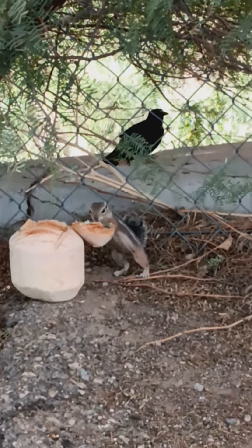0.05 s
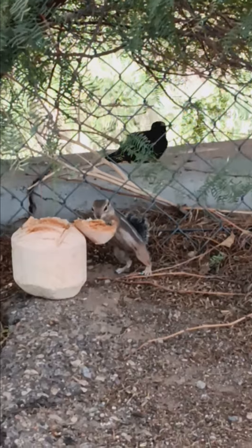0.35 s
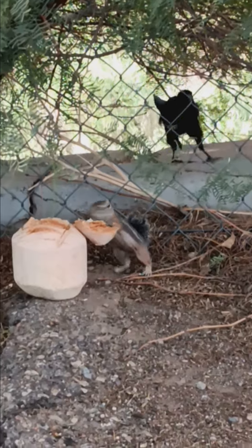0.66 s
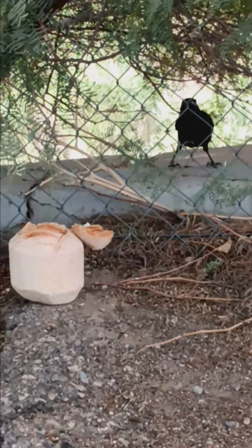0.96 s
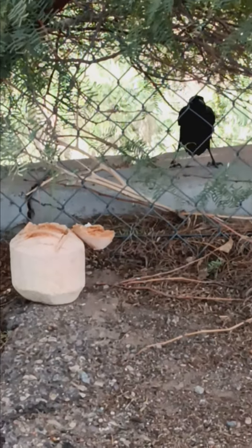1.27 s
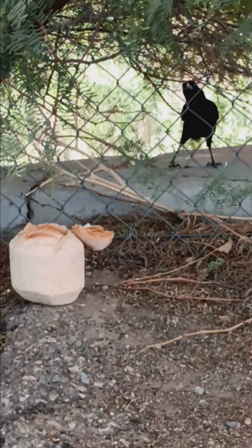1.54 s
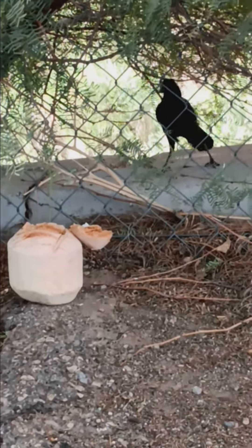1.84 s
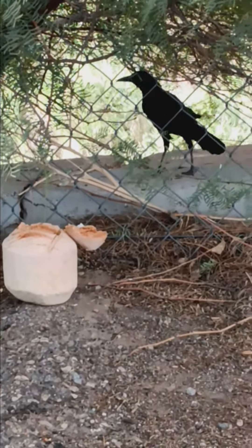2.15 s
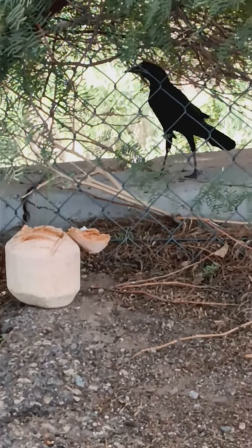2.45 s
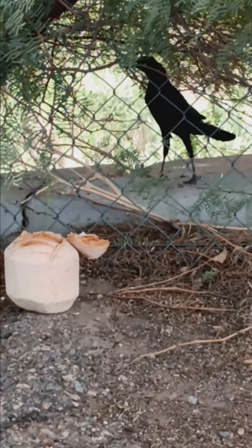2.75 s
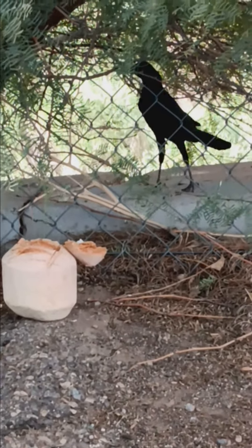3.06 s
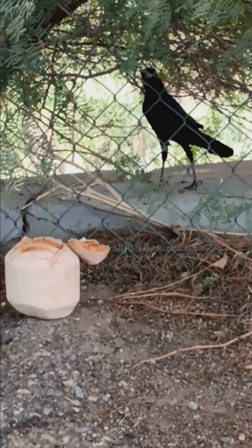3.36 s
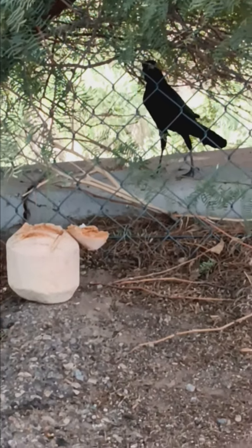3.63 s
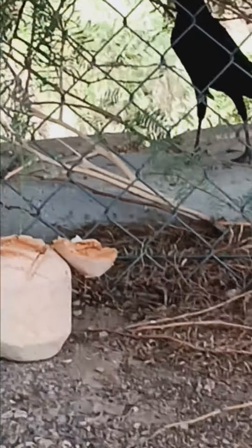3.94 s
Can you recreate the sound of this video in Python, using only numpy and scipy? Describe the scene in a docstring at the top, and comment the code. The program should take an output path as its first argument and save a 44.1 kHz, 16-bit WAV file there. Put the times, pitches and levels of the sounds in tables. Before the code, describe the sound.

A small rodent scurries through dry twigs and litter over a distant traffic rumble.

```python
"""A rodent scurries off

A small rodent leaves its food and runs through dry twigs and litter beside a fence. Each footfall
crushes a cluster of tiny, very bright crackles, mostly on the right. Stalks snap, twigs tick and a
hard scrap knocks once. Distant traffic rumbles underneath, with a wavering engine drone and a little
tyre noise. On the left there are soft bumps, a few dry clicks and, near the end, a far-off whirr."""
import sys
import numpy as np
from scipy import signal
from scipy.io import wavfile

SR = 44100
rng = np.random.default_rng(int(sys.argv[2]) if len(sys.argv) > 2 else 0)


def generate_wav(signal):
    """Clip the signal to [-1, 1] and save it as 16-bit WAV at the path in sys.argv[1]."""
    frames = np.transpose(np.atleast_2d(signal))
    scaled = np.clip(frames, -1, 1) * 32767
    pcm = np.round(scaled).astype(np.int16)
    wavfile.write(sys.argv[1], SR, pcm)


N = 176400  # 4 seconds


def from_db(db):
    """Turn decibels into a number to multiply by."""
    return 10 ** (np.asarray(db) / 20)


def rms_one(x):
    """Scale a signal so its average strength (rms) is 1."""
    return x / np.sqrt(np.mean(x ** 2) + 1e-20)


def level_curve(rows):
    """Join (t/s, level/dB) points into a gain for every sample."""
    return from_db(np.interp(np.arange(N) / SR, *np.transpose(rows)))


def at_hz(points, hz):
    """Read a table at one frequency, with octaves evenly spaced."""
    freqs, values = np.transpose(points)
    return np.interp(np.log(hz), np.log(freqs), values)


def drift(rate):
    """A smooth random wobble of size about 1; a higher rate wobbles faster."""
    r = np.exp(-80 * np.pi * rate / SR)
    noise = rng.standard_normal(N // 40 + 2002)  # one value every 40 samples
    slow = signal.lfilter([1], [1, -2 * r, r * r], noise)[2000:]
    return np.interp(np.arange(N) / 40, np.arange(len(slow)), rms_one(slow))


def keep_band(x, kind, hz, order):
    """Keep the "low", "high" or "band" part of a sound; a higher order cuts more steeply."""
    return signal.sosfilt(signal.butter(order, hz, kind, fs=SR, output="sos"), x)


def resonate(x, hz, width_hz):
    """Make a sound ring around one frequency."""
    r = np.exp(-np.pi * width_hz / SR)
    feedback = [1, -2 * r * np.cos(2 * np.pi * hz / SR), r * r]
    return signal.lfilter(np.array([1, 0, -1]) * (1 - r * r) / 2, feedback, x + 1e-18)


def narrow(x, hz, width_hz):
    """Resonate twice, so less gets through on either side."""
    return resonate(resonate(x, hz, width_hz), hz, width_hz)


def impulses(rows):
    """One sharp tap for each (t/s, level/dB) row."""
    out = np.zeros(N)
    for s, db in rows:
        out[int(s * SR)] += from_db(db)
    return out + 1e-18


def strike(rows, tones):
    """Taps set an object's own tones ringing; each falls 60 dB in its ring time."""
    out, taps = 0, impulses(rows)
    for hz, db, ring_s in tones:
        r = np.exp(-np.log(1000) / (ring_s * SR))
        w = 2 * np.pi * hz / SR
        out = out + from_db(db) * signal.lfilter([0, np.sin(w)], [1, -2 * r * np.cos(w), r * r], taps)
    return out


def burst(rows, rings, decay_s):
    """Each break is a quickly dying spray of tiny cracks that ring."""
    force = signal.lfilter([1], [1, -np.exp(-1 / (decay_s * SR))], impulses(rows))
    return sum(from_db(db) * resonate(force * rng.choice([-1, 1], N), hz, width)
               for hz, width, db in rings)


def pressure(rows, attack_s, release_s):
    """Each touch builds up, holds for its length and dies away."""
    t, power = np.arange(N) / SR, 0
    for s, db, length in rows:
        rise = np.clip((t - s) / attack_s, 0, 1)
        fall = np.exp(-np.clip((t - s - length) / release_s, 0, 20))
        power = power + (from_db(db) * rise * fall) ** 2
    return np.sqrt(power)


def crackle(per_s=650, spread_db=4.2):
    """Tiny cracks of uneven size at random moments."""
    sizes = from_db(spread_db * np.minimum(rng.exponential(1, N), 3.5)) * rng.choice([-1, 1], N)
    return rms_one(sizes * (rng.random(N) < per_s / SR))


def pan(x, left_db=0, right_db=0):
    """Give each side its own level."""
    return from_db([[left_db], [right_db]]) * x


def scatter(x, level_db, ring_s=0.14):
    """A short, blurred echo from the ground, the kerb and the bushes."""
    t = np.arange(SR // 4) / SR
    tails = rng.standard_normal((2, len(t))) * np.exp(-np.log(1000) * t / ring_s)
    return from_db(level_db) * np.array([signal.fftconvolve(x, h / np.linalg.norm(h))[:N] for h in tails])


# how alike the two sides sound: f/Hz, likeness (1 = the same)
LIKENESS = [(30, .99), (180, .98), (300, .88), (600, .65), (1400, .6), (3000, .3), (12000, .1)]
# how much louder the left side is: f/Hz, left minus right/dB
BALANCE = [(60, 0), (190, 1), (330, 5.5), (700, 3), (1300, 1.5), (2000, 0), (3000, 4.5), (12000, -0.2)]
def banded_noise(spectrum, flicker_db):
    """Stereo noise of strength 1, built from bands a third of an octave wide that each flicker."""
    centres = 25 * 2 ** (np.arange(29) / 3)
    sides = np.array([[1], [-1]])
    out, white = 0, rng.standard_normal((2, 2, N + SR // 2))
    for k, hz in enumerate(centres):
        if spectrum[0][0] / 1.13 < hz < spectrum[-1][0] * 1.13:
            common, opposed = keep_band(white[k % 2], "band", [hz / 1.12, hz * 1.12], order=2)[:, -N:]
            alike = at_hz(LIKENESS, hz)
            gain = from_db(at_hz(spectrum, hz) + flicker_db * drift(9.1))
            lean = from_db(sides * at_hz(BALANCE, hz) / 2)
            out = out + gain * lean * (np.sqrt(1 + alike) * common + np.sqrt(1 - alike) * opposed * sides)
    return rms_one(out)


# which way the sound leans: t/s, left minus right/dB
SWAY = [(0.0, 0), (0.68, -2.5), (0.93, -0.5), (1.14, -6.5), (1.38, -1.5), (3.87, 1.5), (3.94, -1), (4.0, 2)]
def sway(x):
    """Shift a sound gently between the sides."""
    return x * level_curve(SWAY) ** np.array([[.5], [-.5]])


# tone colour of the rumble, road roar, tyres and air: f/Hz, relative level/dB
RUMBLE_COLOUR = [(25, -14.5), (40, -4), (55, 0), (80, -0.5), (100, 0), (130, -8), (180, -7), (220, -22)]
ROAD_COLOUR = [(200, -4), (260, 0), (340, 0.5), (420, -7.5), (600, -12.5), (800, -12), (1100, -18.5),
               (1400, -19.5), (2200, -30)]
TYRE_COLOUR = [(700, -2.5), (1000, -12.5), (1300, 3), (1600, 1.5), (1950, -3.5), (2600, 0)]
AIR_COLOUR = [(1410, -29.5), (2400, -4.5), (3830, -7.5), (5330, -8), (7500, -13), (8800, -11.5),
              (10800, -11.5), (15000, -16.5)]
# how the traffic rises and falls: t/s, relative level/dB
RUMBLE_LEVEL = [(0.0, -48.5), (0.13, -47), (0.5, -47.5), (0.54, -56.5), (0.68, -44.5), (1.51, -56),
                (1.66, -45.5), (1.73, -61.5), (1.83, -44.5), (2.16, -52.5), (2.71, -43.5), (3.07, -51.5),
                (3.42, -50), (3.44, -45), (3.71, -51), (3.8, -45), (3.83, -59), (4.0, -48)]
ROAD_LEVEL = [(0, -68.5), (1.3, -67.5), (2.4, -67), (4, -66.5)]
TYRE_LEVEL = [(0, -78), (1.2, -89), (1.5, -77), (2.3, -75.5), (2.8, -70.5), (3.2, -82), (4, -90)]
def traffic():
    """Deep rumble, road roar and tyre noise that comes and goes, over the faint hiss of still air."""
    rumble = from_db(3.5) * level_curve(RUMBLE_LEVEL) * banded_noise(RUMBLE_COLOUR, flicker_db=1.0)
    road = from_db(3.5) * level_curve(ROAD_LEVEL) * banded_noise(ROAD_COLOUR, flicker_db=2.5)
    tyres = level_curve(TYRE_LEVEL) * banded_noise(TYRE_COLOUR, flicker_db=1.5)
    air = from_db(-81.5) * banded_noise(AIR_COLOUR, flicker_db=.7)
    return sway(rumble) + road + keep_band(tyres, "low", hz=2150, order=6) + air


# the engine's weaker overtones: multiple of its note, relative level/dB
ENGINE_OVERTONES = [(1.25, -33), (1.5, -21.5), (2.25, -33), (2.497, -39.5)]
# how the drone rises and falls: t/s, relative level/dB
ENGINE_LEVEL = [(0.0, -56.5), (0.66, -57), (0.7, -44.5), (0.87, -60), (1.54, -51), (1.63, -40),
                (1.71, -50.5), (2.12, -50), (2.21, -60.5), (2.41, -45), (3.22, -55.5), (3.3, -41),
                (3.38, -58), (3.48, -43.5), (3.8, -53), (3.83, -64), (3.97, -48.5), (4.0, -70)]
def engine_drone(note_hz=178.6, wander_hz=1.427, roughness=0.39):
    """A far engine's note and its overtones waver in pitch and strength."""
    phase = 2 * np.pi * np.cumsum(note_hz + wander_hz * drift(2.81)) / SR
    note = 0
    for multiple, db in [(1, 0.026)] + ENGINE_OVERTONES:
        tone = (1 + roughness * drift(21.2)) * np.sin(multiple * phase)
        jitter = roughness * drift(16.4) * np.cos(multiple * phase)
        note = note + from_db(db) * rms_one(tone + jitter)
    return from_db(1.5) * level_curve(ENGINE_LEVEL) * note


# faint whines that last throughout: f/Hz, width/Hz, level/dB
WHINES = [(1087, 6.3, -85.5), (1256, 11, -85)]
# a lower whine that swells and fades: t/s, level/dB
SWELL_LEVEL = [(0, -81.5), (2.2, -90), (2.6, -77), (3.1, -74.5), (3.22, -57.5), (3.36, -80.5), (4, -76)]
def machine_whines():
    """Thin machine whines: noise in bands so narrow that it has a pitch."""
    def whine(hz, width_hz):
        return rms_one(narrow(rng.standard_normal(N), hz, width_hz))
    steady = sum(from_db(db) * whine(hz, width) for hz, width, db in WHINES)
    return steady + level_curve(SWELL_LEVEL) * whine(hz=494, width_hz=10)


# soft brushes over the soil: t/s, level/dB, length/s
SCUFFS = [(.012, -70, 0.003), (1.238, -69.5, 0.018)]
# where they ring: f/Hz, width/Hz, relative level/dB
SCUFF_RINGS = [(3430, 1400, -1.5), (4360, 1900, -7), (8700, 870, -1.5), (10500, 1200, -9)]
def soil_scuffs():
    """Brushing the soil makes a duller crackle, heard on both sides."""
    def grit():
        return rms_one(sum(from_db(db) * resonate(crackle(), hz, width) for hz, width, db in SCUFF_RINGS))
    return pressure(SCUFFS, attack_s=0.006, release_s=0.013) * np.array([grit(), grit()])


# three quick hits, heard as one knock: t/s, level/dB
SCRAP_HITS = [(.1128, -48), (.1141, -56), (.1161, -59.5)]
# the scrap's own tones: f/Hz, relative level/dB, ring time/s
SCRAP_TONES = [(1498, 9, 0.018), (1564, 6.5, 0.018), (1820, -2.5, 0.018), (2060, -25, 0.026),
               (4140, -17, .014), (5800, -16, 0.0054), (8500, -19, 0.01)]
# where its crunch rings: f/Hz, width/Hz, relative level/dB
CRUNCH_RINGS = [(1710, 250, 9), (2540, 1600, -11), (8800, 900, -13)]
def scrap_knock():
    """A hard scrap lands on the left with a woody knock and a crunch."""
    ring = strike(SCRAP_HITS, SCRAP_TONES)
    crunch = burst(SCRAP_HITS, CRUNCH_RINGS, decay_s=.0035)
    knock = keep_band(ring + crunch, "high", hz=1240, order=4)
    return pan(knock, right_db=-13) + scatter(knock, level_db=-16.5)


# taps on twigs: t/s, level/dB
TWIG_TAPS = [(.1494, -69.5), (3.383, -81)]
# the twigs' own tones: f/Hz, relative level/dB, ring time/s
TWIG_TONES = [(1620, 3, 0.019), (2610, -4, 0.02), (3920, 4.5, 0.043), (5630, 3.5, 0.014), (6200, 2, 0.033),
              (8550, 4, 0.028), (10420, 14.5, 0.011)]
def twig_ticks():
    """Small twigs in the middle ring for an instant when tapped."""
    ticks = strike(TWIG_TAPS, TWIG_TONES)
    return ticks + scatter(ticks, level_db=-16.5)


# dry stalks breaking: t/s, level/dB
SNAPS = [(0.1497, -50), (.554, -49), (.575, -55), (.627, -55), (.657, -53), (.690, -40), (.7900, -30.5),
         (.7942, -36), (0.8247, -50), (0.883, -48), (.891, -38.5), (.899, -38.5), (.908, -43), (1.058, -43),
         (2.704, -67), (2.71, -50), (2.738, -67), (2.953, -49), (3.046, -49.5), (3.752, -59)]
# where their bright edge rings: f/Hz, width/Hz, relative level/dB
SNAP_RINGS = [(9100, 270, -1.5), (10900, 1900, -2.5), (11700, 560, 0), (14900, 1100, -15)]
def stalk_snaps(decay_s=0.0021, note_hz=11160, width_hz=930, note_db=3):
    """Stalks on the right break in tiny bursts that ring near 11 kHz; harder breaks are brighter."""
    loudest = max(db for _, db in SNAPS)
    dulling = 0.44  # dB of brightness lost for each dB below the loudest snap
    bright = burst([(s, db - dulling * (loudest - db)) for s, db in SNAPS], SNAP_RINGS, decay_s)
    spray = burst(SNAPS, [(note_hz, width_hz, note_db)], decay_s)
    note = resonate(spray, note_hz, width_hz)
    snaps = keep_band(bright + note, "high", hz=8460, order=8)
    return pan(snaps, left_db=-9.5) + scatter(snaps, level_db=-21)


# the rodent's steps: t/s, level/dB, length/s, brightness/dB
STEPS = [(.507, -66, 0.0087, -5), (0.54, -68, .008, -6), (0.545, -58, 0.029, -5), (0.602, -65, .012, -3),
         (0.62, -56, 0.0069, 4), (0.645, -60.5, 0.077, -6), (0.686, -56, 0.009, -2),
         (0.722, -63, 0.017, -4), (0.758, -70, 0.027, -3), (0.787, -72, .003, 10), (0.822, -48, 0.01, -2),
         (0.863, -68, 0.013, -1), (0.879, -52.5, 0.027, -10), (0.94, -56.5, .016, -0.5),
         (1.006, -74.5, 0.027, 4), (1.036, -69, .004, 7), (1.055, -54.5, 0.026, -4), (1.157, -74, 0.02, -5),
         (1.93, -77, 0.011, -1), (2.56, -77, 0.059, -8), (2.62, -64, 0.012, 1), (2.638, -66.5, 0.016, -11),
         (2.67, -79, 0.025, -2), (2.703, -56, 0.0076, -12), (2.733, -59, 0.0053, -3),
         (2.847, -72, 0.053, -15), (2.919, -69, 0.033, -3), (2.944, -55.5, 0.0096, -8),
         (2.982, -65, 0.02, -4), (3.04, -62, .002, -15), (3.368, -68, 0.009, -7), (3.714, -74, 0.028, -2),
         (3.749, -56, 0.0077, -16), (3.77, -71, 0.031, -9)]
# the litter's narrow rings and its broad rasp: f/Hz, width/Hz, relative level/dB
LITTER_RINGS = [(10300, 620, -3), (10780, 400, -1.5), (11150, 1340, -4.5)]
LITTER_RASP = [(6000, 2000, -21), (8700, 1200, -10), (9730, 880, -9), (12100, 2000, -9), (14000, 1200, -22),
               (14200, 1000, -19.5)]
def footfalls(attack_s=0.00069, release_s=0.018, flicker_db=5):
    """Feet crush dry litter into crackles that ring near 11 kHz; brighter steps add more rasp."""
    share = 0.55  # the part of the crackle's power that all bands have in common
    common = np.sqrt(share) * crackle()

    def crush(force, bands):
        out = 0
        for hz, width, db in bands:
            gain = from_db(db + flicker_db * drift(11))
            cracks = common + np.sqrt(1 - share) * crackle()
            out = out + narrow(gain * force * cracks, hz, width)
        return out
    force = pressure([(s, db, length) for s, db, length, _ in STEPS], attack_s, release_s)
    sharp = pressure([(s, db + bright, length) for s, db, length, bright in STEPS], attack_s, release_s)
    steps = from_db(8) * (crush(force, LITTER_RINGS) + crush(sharp, LITTER_RASP))
    return pan(steps, left_db=-14) + scatter(steps, level_db=-16)


# soft low bumps: t/s, relative level/dB, length/s
BUMPS = [(.55, -54.5, 0.067), (.90, -57.5, 0.016), (.98, -58, 0.028), (1.61, -51.5, 0.02),
         (1.78, -59.5, 0.044), (2.39, -54.5, 0.043), (2.59, -52, 0.034), (2.70, -51, 0.044),
         (2.80, -53, 0.029), (2.96, -48, 0.03), (3.07, -46.5, 0.022), (3.20, -51.5, 0.056),
         (3.27, -47.5, 0.071), (3.52, -57.5, 0.054), (3.73, -58.5, 0.076), (3.94, -62, 0.027)]
# their tone colour: f/Hz, relative level/dB
BUMP_COLOUR = [(200, -15.5), (255, 3.5), (320, 0), (400, -16), (500, -14.5)]
def soft_bumps():
    """Muffled rubs close on the left, like a hand shifting on a microphone."""
    force = pressure(BUMPS, attack_s=0.0044, release_s=0.02)
    rubs = from_db(0.5) * force * banded_noise(BUMP_COLOUR, flicker_db=7.0)
    return pan(rubs, right_db=-8.5)


# small dry clicks: t/s, level/dB
CLICKS = [(1.637, -81), (2.778, -59), (3.231, -64)]
# their tones: f/Hz, relative level/dB, ring time/s
CLICK_TONES = [(2260, -2, 0.027), (2940, -5.5, 0.029), (8800, -5.5, 0.0098), (9300, -3.5, 0.01)]
def near_clicks():
    """Light taps ring briefly, close on the left, with no echo."""
    return pan(strike(CLICKS, CLICK_TONES), right_db=-16)


# where the whirr rings: f/Hz, width/Hz, relative level/dB
WHIRR_RINGS = [(1210, 300, -0.5), (1503, 190, 1)]
# how it rises: t/s, level/dB
WHIRR_LEVEL = [(0, -106), (2.5, -87), (2.7, -86), (3.08, -70), (3.27, -67), (3.42, -68), (3.6, -71.5),
               (3.8, -67), (4, -67.5)]
def distant_whirr(waver_db=5.5):
    """Two wavering bands of far-off noise rise on the left near the end."""
    rings = sum(from_db(db + waver_db * drift(5)) * narrow(rng.standard_normal(N), hz, width)
                for hz, width, db in WHIRR_RINGS)
    dull = keep_band(rings, "low", hz=1710, order=12)
    return pan(level_curve(WHIRR_LEVEL) * rms_one(dull), right_db=-29.5)


def scene():
    """The animal and the other close sounds over the distant traffic."""
    animal = footfalls() + stalk_snaps() + soil_scuffs() + scrap_knock() + twig_ticks()
    close = soft_bumps() + near_clicks()
    distant = sway(engine_drone() + machine_whines()) + traffic() + distant_whirr()
    return animal + close + distant


def record(dry):
    """The left side comes about a millisecond late, and the very highest treble is cut."""
    lag_s, cutoff_hz = 0.001089, 15800
    n = np.arange(N)
    left = np.interp(n - lag_s * SR, n, dry[0])
    treble_cut = signal.ellip(10, .2, 70, cutoff_hz, fs=SR, output="sos")
    return signal.sosfilt(treble_cut, np.array([left, dry[1]]))


dry = scene()
out = record(dry)
generate_wav(out)
```